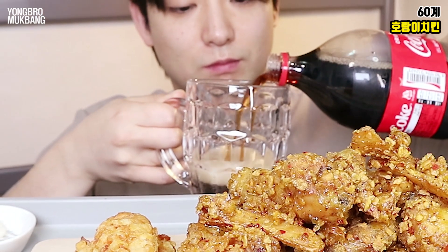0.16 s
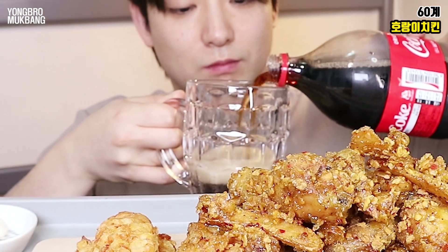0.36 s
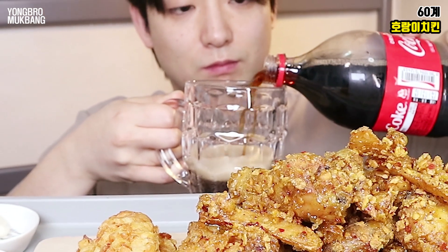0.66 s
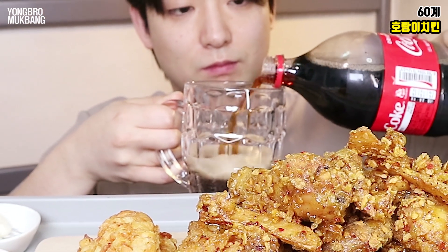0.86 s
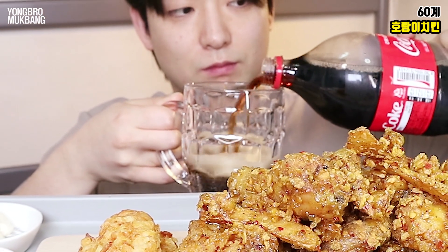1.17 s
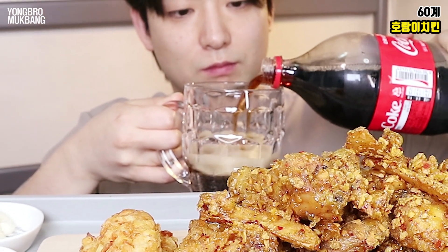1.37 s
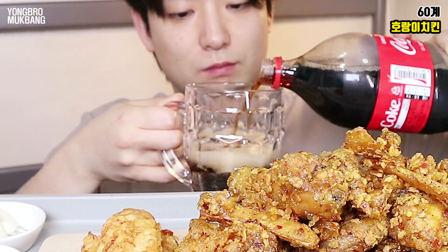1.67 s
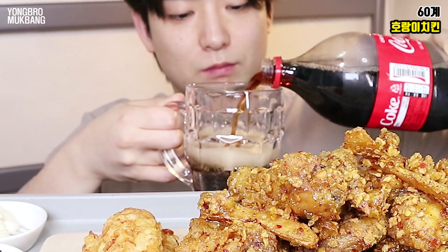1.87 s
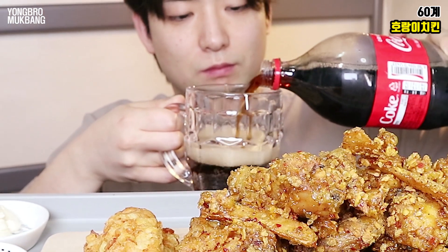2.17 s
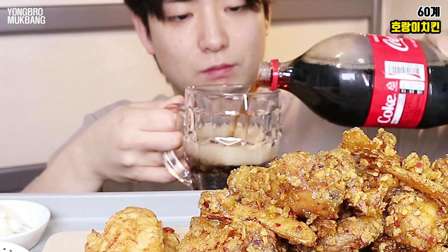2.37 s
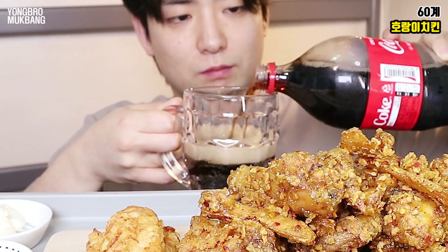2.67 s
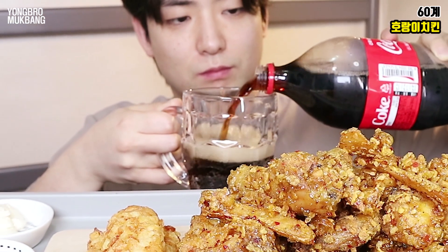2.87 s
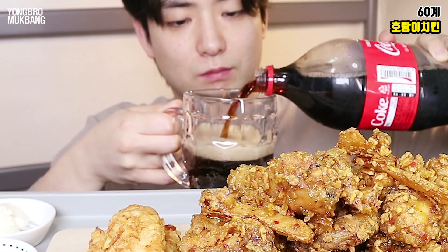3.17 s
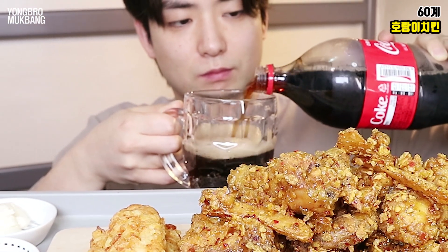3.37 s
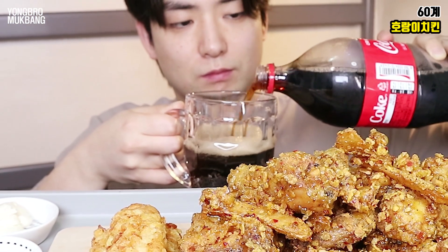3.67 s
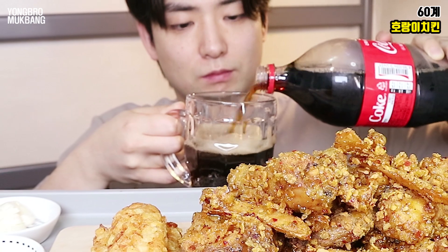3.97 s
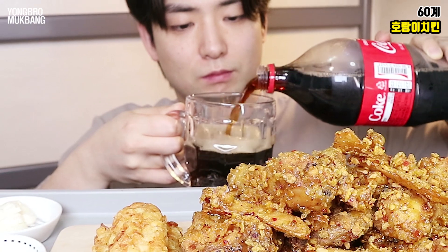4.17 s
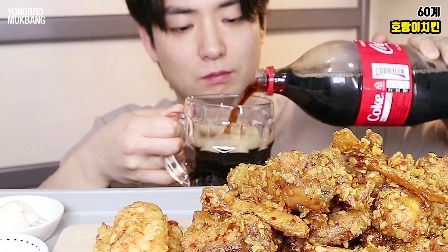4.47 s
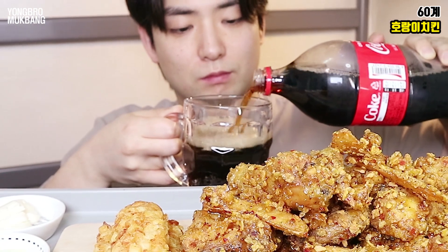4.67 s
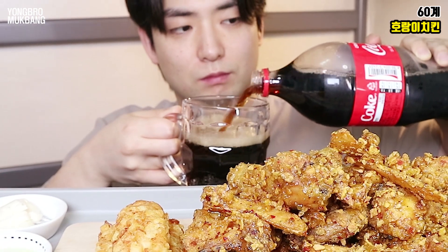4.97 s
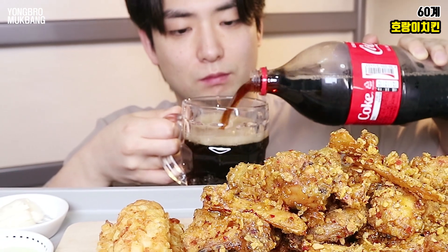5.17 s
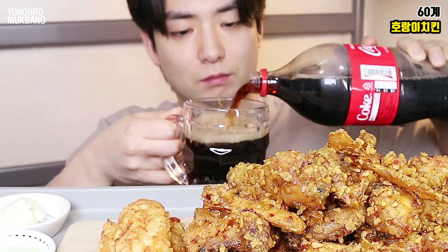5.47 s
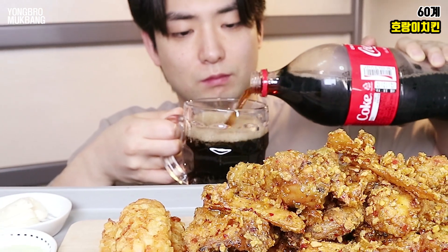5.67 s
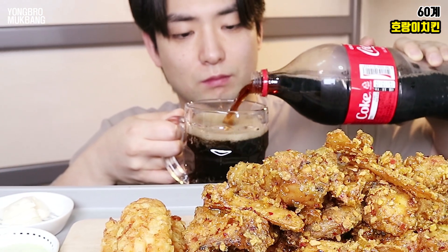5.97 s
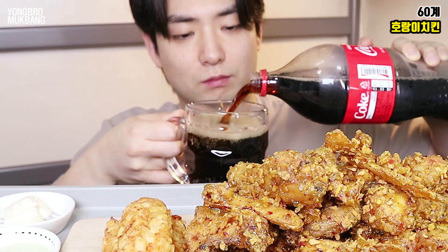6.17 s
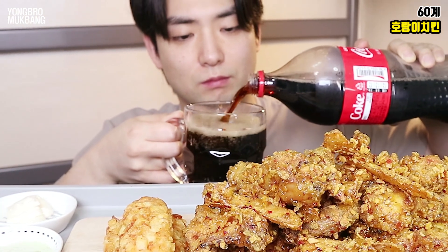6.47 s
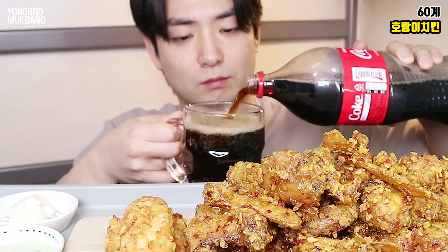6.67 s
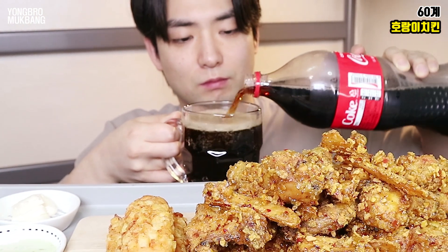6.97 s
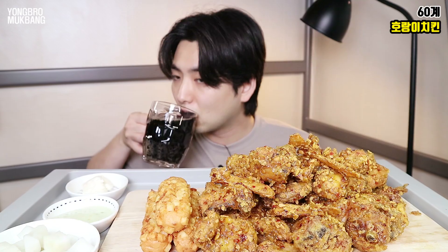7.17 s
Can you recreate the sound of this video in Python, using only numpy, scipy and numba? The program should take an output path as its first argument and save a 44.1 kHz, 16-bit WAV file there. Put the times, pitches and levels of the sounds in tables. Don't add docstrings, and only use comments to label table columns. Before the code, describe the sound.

Very close, a fizzy drink pours from a plastic bottle into a glass mug. Dense bubbly gurgling rings hollow, rises in pitch and thins as the mug fills, while crisp foam fizz continues and soft air glugs thump in the bottle. Around five seconds there is a wet double plop. The pour stops abruptly near the end, leaving small gulps and a dull knock over faint room hum.

```python
import sys
import numpy as np
from scipy import signal
from scipy.fft import rfft, irfft, next_fast_len
from scipy.io import wavfile
from scipy.ndimage import uniform_filter1d
from numba import njit

SR = 44100
rng = np.random.default_rng(int(sys.argv[2]) if len(sys.argv) > 2 else 0)


def wrap_up_sound(samples):
    columns = np.atleast_2d(samples).T
    tamed = np.clip(columns, -1, 1)
    steps = np.round(tamed * 32767).astype(np.int16)
    wavfile.write(sys.argv[1], SR, steps)


def invert_db(level):
    return 10 ** (np.asarray(level, dtype=float) / 20)


N = 323253
CUT_S = 7.174

# middle_s, peak_db, pitch_hz, length_s
STREAM_BUBBLES = [(0.004, -28.5, 903, 0.0044), (0.133, -27, 948, 0.013), (0.172, -27.5, 907, 0.008),
                  (0.237, -26, 940, 0.004), (0.248, -26, 910, 0.0072), (0.271, -22, 894, 0.0045),
                  (0.34, -26.5, 893, 0.01), (0.359, -23, 893, 0.0068), (0.407, -27.0, 910, 0.0042),
                  (0.42, -25.5, 863, 0.004), (0.447, -23, 875, 0.0042), (0.495, -30, 930, 0.012),
                  (0.536, -26, 919, 0.01), (0.546, -25, 942, 0.0042), (0.565, -24.5, 918, 0.007),
                  (0.581, -18.5, 908, 0.0047), (0.612, -25, 910, 0.0046), (0.625, -23, 900, 0.0056),
                  (0.642, -24.5, 910, 0.004), (0.669, -25.5, 958, 0.0129), (0.749, -27, 830, 0.0064),
                  (0.76, -24, 866, 0.0046), (0.783, -25, 890, 0.0087), (0.793, -25.0, 883, 0.0063),
                  (0.802, -22, 943, 0.0035), (0.84, -28, 914, 0.0042), (0.891, -22.5, 915, 0.0061),
                  (0.899, -24.5, 950, 0.0059), (0.933, -24, 945, 0.014), (0.968, -25.5, 950, 0.0042),
                  (1.044, -26.0, 900, 0.0047), (1.058, -24, 942, 0.0048), (1.078, -21.5, 948, 0.0072),
                  (1.089, -22.5, 952, 0.0077), (1.123, -24, 887, 0.0071), (1.136, -24.5, 928, 0.0058),
                  (1.146, -26.0, 920, 0.005), (1.172, -24, 936, 0.0062), (1.188, -21.5, 945, 0.0069),
                  (1.207, -22.5, 930, 0.0068), (1.216, -22, 941, 0.0065), (1.254, -26.0, 946, 0.0066),
                  (1.311, -25.5, 980, 0.0058), (1.327, -24.5, 960, 0.01), (1.374, -22.5, 948, 0.0069),
                  (1.398, -23, 928, 0.0038), (1.421, -21.0, 909, 0.0074), (1.465, -22, 888, 0.0052),
                  (1.504, -21.0, 944, 0.0083), (1.535, -23.0, 997, 0.01),
                  (1.562, -23, 909, 0.0045), (1.586, -19.5, 932, 0.0036), (1.608, -23.0, 924, 0.0066),
               (1.627, -26.0, 925, 0.0059), (1.653, -28, 937, 0.007), (1.698, -25.5, 894, 0.005),
               (1.717, -28, 933, 0.0038), (1.746, -24.5, 948, 0.009), (1.771, -21.5, 911, 0.0059),
               (1.801, -26, 959, 0.0038), (1.815, -27, 956, 0.012), (1.839, -26.0, 950, 0.0067),
               (1.85, -24.5, 910, 0.0062), (1.865, -23.5, 932, 0.006), (1.916, -24, 910, 0.006),
               (1.93, -20.5, 976, 0.0036), (1.957, -24.5, 997, 0.013), (1.989, -26.5, 893, 0.017),
               (2.007, -25.0, 932, 0.0073), (2.024, -26, 952, 0.02), (2.108, -28, 950, 0.0067),
               (2.123, -26.5, 945, 0.011), (2.151, -23.5, 930, 0.0075), (2.179, -22.5, 920, 0.0044),
               (2.203, -24.5, 880, 0.0086), (2.246, -23.5, 948, 0.0083), (2.275, -24, 900, 0.01),
               (2.293, -23.5, 957, 0.009), (2.347, -26.0, 929, 0.0065), (2.379, -24.5, 898, 0.0063),
               (2.401, -22.5, 937, 0.0046), (2.417, -25.5, 941, 0.0052), (2.428, -26, 977, 0.0038),
               (2.528, -27.5, 947, 0.014), (2.559, -26.0, 950, 0.0063), (2.578, -25.5, 936, 0.0072),
               (2.612, -25, 950, 0.0063), (2.689, -19.5, 955, 0.011), (2.698, -21, 915, 0.0031),
               (2.732, -24, 907, 0.0051), (2.78, -26, 934, 0.0086), (2.797, -25.5, 966, 0.0073),
               (2.82, -25, 935, 0.012), (2.865, -28.5, 957, 0.01), (2.944, -24, 959, 0.016),
               (2.961, -23.5, 927, 0.0058), (3.025, -25.5, 989, 0.0057), (3.048, -25.5, 994, 0.0047),
               (3.087, -24.0, 966, 0.0074),
                  (3.103, -26, 930, 0.0072), (3.115, -27.5, 981, 0.0039), (3.128, -25.5, 935, 0.0038),
                (3.154, -26, 950, 0.018), (3.172, -28, 973, 0.0041), (3.209, -27.0, 989, 0.0041),
                (3.221, -29.5, 967, 0.0107), (3.258, -31, 960, 0.0053), (3.271, -33, 930, 0.0078),
                (3.292, -24.5, 980, 0.0065), (3.304, -29, 973, 0.0033), (3.339, -30.5, 997, 0.008),
                (3.368, -27.5, 967, 0.0061), (3.378, -28, 947, 0.0079), (3.397, -26.5, 963, 0.015),
                (3.448, -29.5, 996, 0.0037), (3.472, -29.5, 994, 0.0075), (3.486, -28.5, 980, 0.0085),
                (3.5, -28.5, 965, 0.007), (3.609, -29.5, 1000, 0.0089), (3.63, -32, 989, 0.0078),
                (3.665, -33, 1020, 0.0051), (3.724, -24.5, 1020, 0.0037), (3.75, -27, 1005, 0.0028),
                (3.767, -27.5, 968, 0.0053), (3.791, -28.5, 980, 0.01), (3.811, -28, 970, 0.0061),
                (3.894, -29.5, 1034, 0.0039), (3.918, -26, 1035, 0.0044), (3.927, -25, 1040, 0.004),
                (3.951, -26.0, 980, 0.012), (3.992, -33, 999, 0.009), (4.019, -27.5, 992, 0.0062),
                (4.058, -29, 981, 0.006), (4.072, -26, 1008, 0.0039), (4.084, -25.5, 1120, 0.0063),
                (4.126, -26.5, 1029, 0.0047), (4.185, -33, 976, 0.0094), (4.22, -31.0, 1039, 0.0031),
                (4.309, -28.0, 950, 0.0093), (4.342, -19.5, 960, 0.0082), (4.425, -29, 1017, 0.0032),
                (4.442, -31.5, 1007, 0.011), (4.555, -32.5, 1086, 0.0039), (4.591, -30.0, 1101, 0.004),
                (4.622, -28, 1071, 0.0042), (4.641, -28.5, 1025, 0.01), (4.713, -30, 1100, 0.0031),
                (4.784, -30.5, 1140, 0.0041),
                  (0.083, -31.0, 875, 0.0055), (0.111, -28.5, 894, 0.005), (0.12, -28.0, 941, 0.0059),
                 (0.185, -29.5, 894, 0.0077), (0.227, -27.5, 912, 0.0032), (0.286, -28.5, 979, 0.0114),
                 (0.368, -28.0, 930, 0.0068), (0.396, -27.0, 920, 0.007), (0.817, -26, 925, 0.015),
                 (0.873, -25, 919, 0.008), (1.0, -28.5, 841, 0.0078), (1.026, -28, 858, 0.0045),
                 (1.07, -25, 880, 0.0057), (1.337, -25, 980, 0.01), (1.525, -25.5, 930, 0.0111),
                 (1.571, -25.5, 916, 0.0108), (1.759, -25.0, 929, 0.0085), (1.908, -28, 921, 0.0061),
                 (2.265, -27.5, 991, 0.0066), (2.674, -24.5, 950, 0.0063), (2.746, -25.5, 940, 0.015),
                 (3.01, -26.5, 926, 0.0077), (3.077, -23.5, 954, 0.0072), (5.352, -35.0, 1230, 0.0046),
                 (5.495, -35, 1170, 0.0071), (5.556, -40, 1220, 0.0041), (5.68, -36.5, 1180, 0.01),
                 (5.718, -38.0, 1038, 0.0067), (5.759, -33, 1201, 0.0038), (5.77, -32.5, 1161, 0.0067),
                 (5.788, -37, 1188, 0.0088), (5.809, -36.5, 1165, 0.0031)]
BUBBLES = STREAM_BUBBLES


def evened(x):
    return x / np.sqrt(np.mean(x ** 2) + 1e-20)


def along(rows):
    s, *columns = np.transpose(rows)
    return [np.interp(np.arange(N) / SR, s, c) for c in columns]


def add(mix, s, sound):
    part = mix[round(s * SR):][:len(sound)]
    part += sound[:len(part)]


def wander(per_s):
    steps = rng.standard_normal(2000)
    return np.interp(np.arange(N) * per_s / SR, np.arange(2000), steps)


def pops(per_s, spread_db):
    hit, size, sign = rng.random((3, N))
    height = invert_db(-spread_db * np.log(size + 0.013))
    return evened((hit < per_s / SR) * height * np.sign(sign - 0.5))


def noise(points):
    f, db = np.transpose(points)
    size = next_fast_len(N)
    hz = np.fft.rfftfreq(size, 1 / SR)
    gain = invert_db(np.interp(np.log(hz + 1), np.log(f + 1), db))
    return evened(irfft(rfft(rng.standard_normal(size)) * gain, size)[:N])


def ring(x, hz, width):
    r = np.exp(-np.pi * width / SR)
    return 2 * signal.lfilter([1 - r], [1, -r * np.exp(2j * np.pi * hz / SR)], x).real


@njit
def smooth(x, r):
    out = np.zeros_like(x)
    for i in range(1, len(x)):
        out[i] = r[i] * out[i - 1] + (1 - r[i]) * x[i]
    return out


def sweep(x, hz, width):
    turn = np.exp(2j * np.pi * np.cumsum(hz) / SR)
    r = np.exp(-np.pi * width / SR)
    return 2 * (turn * smooth(smooth(x / turn, r), r)).real


def bubble(hz, t60, rise, soft):
    t = np.arange(round(t60 * SR)) / SR
    shape = (1 - np.exp(-t / soft)) ** 2 * invert_db(-60 * t / t60)
    return shape / shape.max() * np.sin(2 * np.pi * hz * t * (1 + rise * t / t60))


def swell(hz, length, skew, glide):
    t = np.arange(-round(3 * length * SR), round(3 * length * SR)) / SR
    half = np.where(t < 0, 1 - skew, 1 + skew) * length / 2
    return invert_db(-6 * (t / half) ** 2) * np.cos(2 * np.pi * hz * t * (1 + glide * t / length))


def mottled(x, depth_db):
    z = signal.stft(x, nperseg=1024, noverlap=768)[2]
    ridges, blobs = rng.standard_normal((2, *z.shape))
    ridges = evened(uniform_filter1d(uniform_filter1d(ridges, size=3, axis=0), size=22, axis=1))
    blobs = evened(uniform_filter1d(uniform_filter1d(blobs, size=5, axis=0), size=5, axis=1))
    gain = invert_db(depth_db * (ridges + 0.47 * blobs))
    return evened(signal.istft(z * gain, nperseg=1024, noverlap=768)[1][:N])


def filled():
    return np.clip((np.arange(N) / SR - 2.5) / 2.53, 0, 1)


def lulls():
    depth, span = 0.68, 1.34
    t, out = np.arange(N) / SR, np.ones(N)
    for s, _, _, length in BUBBLES:
        near = slice(max(round((s - 0.05) * SR), 0), round((s + 0.05) * SR))
        out[near] *= 1 - depth * np.exp(-((t[near] - s) / (span * length)) ** 2)
    return out


def nearby(x, through_db, patchy_db):
    # pitch_hz, width_hz, low_mug_db, full_mug_db
    resonances = [(620, 120, -9, -9), (800, 90, 4, -3), (875, 100, 6, -1), (970, 85, 5, 4),
                  (1180, 115, 0, 3.5), (1340, 70, -5, -3), (1660, 110, -2, 1), (1850, 110, -4, -3),
                  (2020, 90, -7, -8), (2200, 90, -2, 1.5), (2350, 95, -7.5, -12), (2700, 65, -1, 3),
                  (2925, 80, -10, 1), (3150, 70, -4, 0)]
    out, full = invert_db(through_db) * x, filled()
    for k, (hz, width, low_db, full_db) in enumerate(resonances):
        sign = -1 if k == 2 else 1
        level_db = low_db + (full_db - low_db) * full + patchy_db * wander(11)
        out = out + sign * ring(invert_db(level_db) * x, hz, width)
    return out


def reflected(x):
    # pitch_hz, width_hz, share
    dips = [
        (700, 60, .3),
        (1075, 60, .4),
    ]
    return x - sum(share * ring(x, hz, width) for hz, width, share in dips)


def room():
    # pitch_hz, level_db per Hz
    air_spectrum = [(30, -36), (50, -40), (100, -16), (160, -15.5), (200, -1.5), (400, -2), (500, -9.5),
                    (640, -5.5), (1000, -7.5), (1700, -16), (1800, -16.5), (4000, -22), (12000, -27),
                    (15700, -31)]
    # pitch_hz, drift_hz, level_db, flutter_db
    hum_lines = [
        (67, 0.93, -74, 1.5),
        (60.7, .9, -81.5, 5),
        (340.7, 1.41, -61.5, 3),
        (572.6, 1.4, -65.5, 0.5),
        (692, 0.71, -68.5, 2),
    ]
    hum = 0
    for hz, drift, db, flutter_db in hum_lines:
        tone = np.sin(2 * np.pi * np.cumsum(hz + drift * wander(4)) / SR)
        hum = hum + invert_db(db + flutter_db * wander(12)) * tone
    air = noise(air_spectrum)
    treble_band = signal.butter(2, [1500, 4500], "band", fs=SR, output="sos")
    treble = signal.sosfiltfilt(treble_band, air)
    air = air - 0.27 * (np.arange(N) > CUT_S * SR) * treble
    return invert_db(-52 + 0.25 * wander(16)) * air + hum


def knocks():
    # start_s, peak_db, pitch_hz, t60_s
    hits = [(4.9598, -20, 990, 0.038), (4.9995, -23, 1155, .024), (.575, -34.5, 428, 0.041),
            (7.185, -48, 830, 0.042), (7.222, -46, 426, 0.097), (7.255, -38.5, 750, 0.035),
            (7.2785, -41.5, 770, 0.031), (2.9696, -39, 1900, .005), (3.0744, -40, 2100, .006),
            (3.5483, -40, 2100, .008), (7.2998, -29.5, 372, 0.018), (7.297, -53, 3100, 0.019),
            (7.291, -59, 7000, .06), (7.315, -55, 9800, .06), (3.287, -38, 302, 0.031),
            (7.141, -41.5, 540, 0.017), (7.197, -48, 7000, 0.001), (7.267, -48.5, 7800, 0.0016),
            (7.219, -51, 1650, .04), (7.252, -49, 1500, 0.03)]
    out = np.zeros(N)
    for s, db, hz, t60 in hits:
        add(out, s, invert_db(db) * bubble(hz, t60, 0.033, min(0.00085, t60 / 20)))
    tipping = np.clip((np.arange(N) / SR - 7.2) / 0.097, 0, 1)
    trickle = evened(ring(ring(rng.standard_normal(N), 2850, 350), 2850, 450))
    rumble = evened(ring(ring(rng.standard_normal(N), 640, 600), 600, 900))
    out = out + tipping ** 4 * invert_db(-56.5 + 3.2 * wander(70)) * trickle
    return out + tipping * invert_db(-53 + 3.0 * wander(60)) * rumble


def glugs():
    # start_s, peak_db, pitch_hz
    air_pockets = [(0.117, -46, 215), (0.438, -47, 215), (0.791, -42.5, 203), (1.098, -41.5, 209),
                   (1.457, -43, 198), (1.877, -38, 194), (2.071, -53, 137), (2.269, -48, 182),
                   (3.284, -48, 213), (3.833, -52, 174), (4.215, -46, 191), (4.55, -46, 213),
                   (5.252, -47, 205), (5.588, -57, 167), (5.914, -43.5, 180), (7.138, -44, 216)]
    early_t60, late_t60 = 0.096, 0.039
    out, full = np.zeros(N), filled()
    for s, db, hz in air_pockets:
        t60 = early_t60 + (late_t60 - early_t60) * full[round(s * SR)]
        add(out, s, invert_db(db) * bubble(hz, t60, 0.12, 0.0034))
    return out


def fizz():
    # pitch_hz, width_hz, low_mug_db, full_mug_db
    foam_bands = [(5307, 144, -11.5, -8), (6306, 310, -2.5, 2), (6910, 440, 1, -0.5),
                  (7230, 240, 0.5, -0.5), (7720, 190, -4.5, -13), (8290, 230, -5.5, -7.5),
                  (8670, 180, -11, -9.5), (9380, 230, -33, -5.5), (9750, 93, -14.5, -11),
                  (10210, 150, -7, -12.5), (11200, 260, -5.5, -11), (12300, 300, -19, -18.5),
                  (12900, 180, -21, -16), (13600, 200, -22, -18)]
    # pitch_hz, level_db per Hz
    spray = [(760, -66), (1300, -1), (1460, -3), (2500, -3), (2690, -2), (2930, -12.5), (4000, -21),
             (5750, -11.5), (7080, -2.5), (9090, -14), (10300, -11.5), (15600, -30)]
    # time_s, level_db
    activity = [
        (0.0, -57),
        (0.8, -49),
        (1.14, -48),
        (2.6, -50.5),
        (3.51, -54.5),
        (3.83, -50),
        (4.25, -52),
        (5.49, -49.5),
        (6.39, -48),
        (7.17, -48),
    ]
    full = filled()
    surge = invert_db(1.1 * wander(35) + 0.25 * wander(11))
    bands = 0
    for hz, width, low_db, full_db in foam_bands:
        burst = ring(ring(pops(900, 2.66), hz, 1.42 * width), hz, 5.4 * width)
        patches = 1.5 * wander(14) + 0.9 * wander(3)
        bands = bands + invert_db(low_db + (full_db - low_db) * full + patches) * evened(burst)
    bands = mottled(bands, depth_db=4.4)
    hiss = mottled(noise(spray), depth_db=2.5)
    return invert_db(along(activity)[0] + 0.87) * surge * evened(bands + invert_db(-2.5) * hiss)


def plops():
    # start_s, peak_db, pitch_hz
    surface_bubbles = [(3.453, -38, 1900), (3.658, -34, 2080), (3.7128, -40, 1650), (3.8386, -35, 2200),
                       (4.7385, -37, 1690), (4.961, -22, 1220), (5.046, -25, 1160), (5.075, -25, 1840),
                       (5.079, -28, 990), (5.0465, -20, 1820), (5.0586, -16.5, 1705), (5.138, -29, 1750),
                       (5.768, -27, 1140), (5.7712, -31, 1770), (6.2418, -32, 1610), (6.263, -25, 1167),
                       (6.265, -23.5, 1650), (6.4027, -21, 1600), (6.493, -32.5, 2650), (6.6553, -28, 1750),
                       (6.738, -22, 1840), (6.8114, -30, 1690), (6.9071, -30.5, 1610),
                       (7.1406, -31.5, 2310)]
    # start_s, length_s, level_db, pitch_hz
    gushes = [(4.958, 0.084, -32.5, 1080), (5.015, 0.11, -36.5, 1150), (5.04, 0.046, -40, 2080),
              (4.985, 0.03, -41, 1570), (5.738, 0.056, -46.5, 2290), (4.7, 0.089, -46, 1150),
              (6.24, 0.09, -40, 1190), (6.23, 0.19, -44, 1650), (6.34, 0.12, -41.5, 2220),
              (6.24, 0.13, -48, 2650), (6.07, 0.13, -49, 2250), (4.15, 0.12, -48.5, 2230),
              (3.99, 0.076, -47.5, 2700), (3.62, .18, -53, 2200), (3.68, 0.13, -50.5, 1650),
              (3.41, 0.05, -52, 1650), (4.68, .2, -50, 1830), (4.55, 0.51, -53, 2250),
              (5.1, 0.11, -50, 1800), (4.55, 0.29, -58, 2700), (6.45, 0.28, -50.5, 2700),
              (5.92, 0.11, -50, 2260), (3.03, 0.35, -55.5, 2690), (0.39, 0.08, -54, 2680),
              (.78, .2, -57.5, 2710), (1.05, .15, -52.5, 2700), (2.03, .16, -57, 2700),
              (2.41, .2, -58, 2710), (2.69, .09, -56.5, 2700), (.43, .1, -54, 2420),
              (.74, .28, -56.5, 2320), (1.04, .075, -51, 2400), (1.15, .25, -55.5, 2290),
              (1.52, .25, -54, 2350), (2.04, .21, -55, 2285), (2.36, .17, -52, 2290),
              (7.128, .05, -51, 2300), (5.312, 0.1, -48.5, 2600), (5.898, 0.19, -49, 2750),
              (6.75, 0.47, -50, 2740)]
    large, small = np.zeros(N), np.zeros(N)
    slides = rng.uniform(-1.03, 1, len(BUBBLES))
    for (s, db, hz, length), slide in zip(BUBBLES, slides):
        sound = swell(hz, 0.98 * length, 0.04, 0.072 * slide)
        add(large, max(s - len(sound) / 2 / SR, 0), invert_db(db - 0.2) * sound)
    for s, db, hz in surface_bubbles:
        add(small, s, invert_db(db - 5.5) * bubble(hz, 0.019, 0.047, 0.0019))
    small *= invert_db(1.7 * wander(200))
    bursts = pops(500, 2.4) + 0.64 * rng.standard_normal(N)
    gush_width = 150
    for s, length, db, hz in gushes:
        part = bursts[round(s * SR):][:round(length * SR)]
        part = evened(ring(ring(part, hz, gush_width), hz, gush_width))
        add(small, s, invert_db(db) * part * signal.windows.tukey(len(part), 0.6))
    return large + invert_db(-5) * small + invert_db(-10.5) * nearby(small, -17, 1.1)


def stream():
    # time_s, level_db
    strength = [(0.0, -38.5), (0.6, -35), (1.22, -33.5), (2.18, -34), (3.05, -36), (3.7, -39),
                (4.05, -39.5), (4.65, -44), (5.0, -48.5), (5.45, -50), (5.81, -50), (5.93, -52),
                (6.69, -51.5), (7.17, -70)]
    # time_s, pitch_hz
    column_pitch = [
        (0, 861),
        (1.5, 909),
        (3, 963),
        (4, 1050),
        (5, 1147),
        (5.8, 1294),
        (6.3, 1550),
        (7.2, 1760),
    ]
    column_db, hz = along(strength)[0], along(column_pitch)[0]
    splash_db = -55.5 + 9 * np.log2(hz / hz[0])
    gurgle = invert_db(1.36 * wander(45) + 1.23 * wander(110) + 0.36 * wander(9.9))
    drive = gurgle * (0.43 * pops(500, 1.85) + 0.64 * rng.standard_normal(N))
    column = sweep(drive, hz * (1 + 0.022 * wander(40)), 0.33 * hz)
    column = nearby(column, -29, 0.99)
    column /= np.sqrt(uniform_filter1d(column ** 2, size=SR // 18))
    splash = gurgle * (0.5 * pops(900, 2.8) + 0.7 * rng.standard_normal(N))
    splash = nearby(ring(ring(splash, 2090, 1560), 1980, 1600), -19, 2.8)
    churn = evened(ring(ring(drive, 612, 110) + 0.5 * ring(drive, 440, 180), 580, 500))
    gaps = lulls()
    unsteady = invert_db((1.16 + 2.0 * filled()) * wander(14))
    column_sound = invert_db(column_db + 2.0) * (gaps * unsteady * column + invert_db(-19) * churn)
    splash_sound = invert_db(splash_db - 2.8 + 3.5 * (1 - gaps)) * evened(splash)
    return column_sound, splash_sound


def scene():
    # pitch_hz, level_db per Hz
    port_spectrum = [(18, -54), (30, -30), (192, 2.5), (791, -2), (901, -18), (1600, -15), (3900, -20),
                     (5480, -17), (6420, -19), (8780, -18), (15600, -8)]
    pouring = np.clip((CUT_S - np.arange(N) / SR) / 0.001, 0, 1)
    (column, splash), foam, bubbles = stream(), fizz(), plops()
    stir = invert_db(1.2 * wander(48))
    pour = reflected(column + bubbles) + stir * (splash + foam)
    mid = pouring * pour + glugs() + knocks() + room()
    side = invert_db(-69) * noise(port_spectrum) + invert_db(-30.0) * np.gradient(mid)
    return np.array([mid + side, mid - side])


def roll_off(x):
    return signal.sosfilt(signal.butter(12, 15770, fs=SR, output="sos"), x)


def record(dry):
    bass_cut = signal.butter(2, 32, "high", fs=SR, output="sos")
    return roll_off(signal.sosfilt(bass_cut, dry))


dry = scene()
out = record(dry)
wrap_up_sound(out)
```